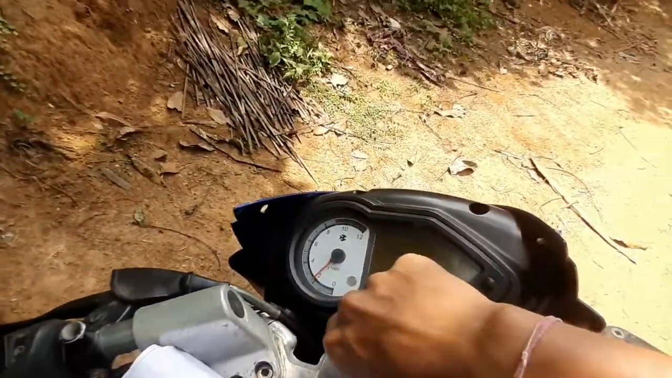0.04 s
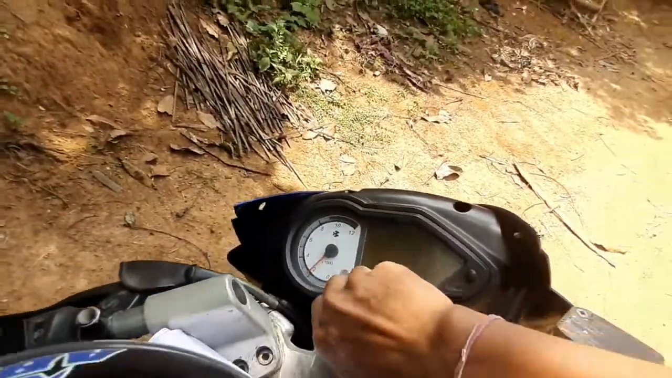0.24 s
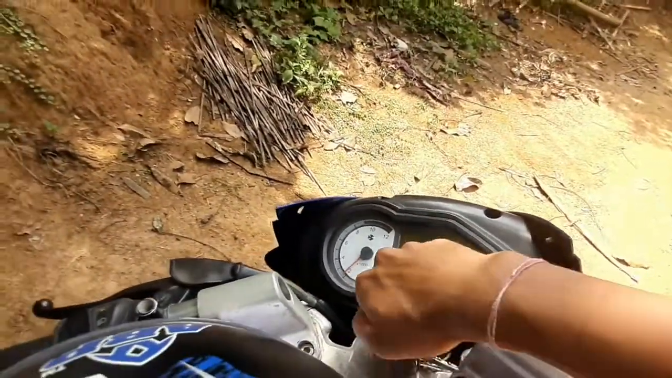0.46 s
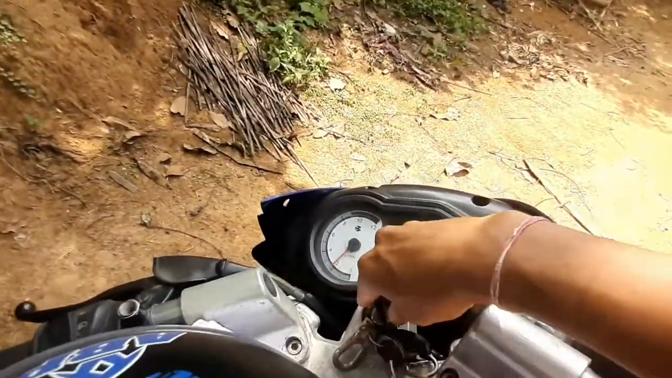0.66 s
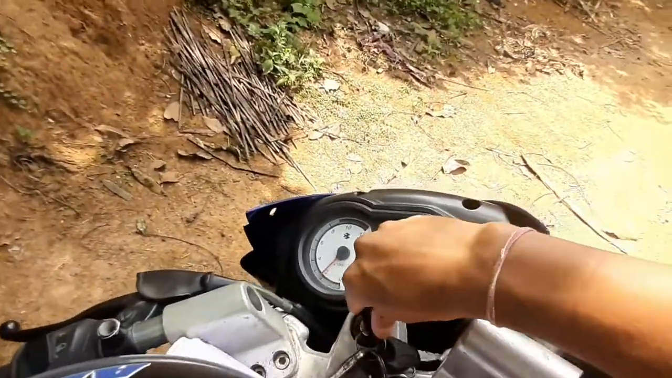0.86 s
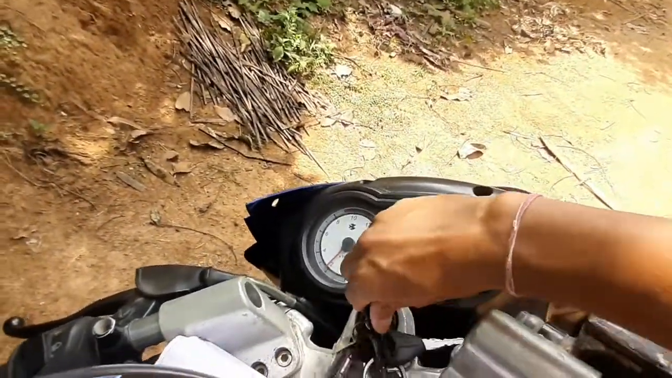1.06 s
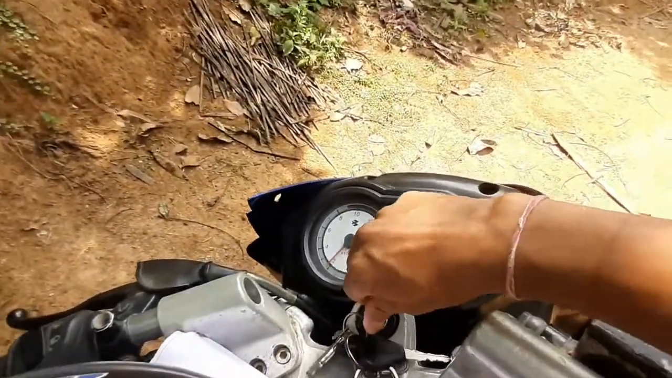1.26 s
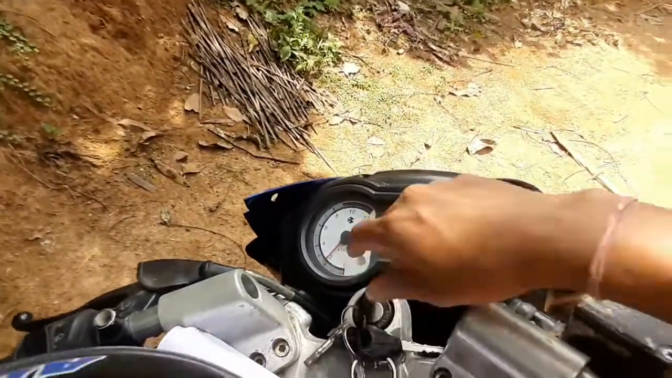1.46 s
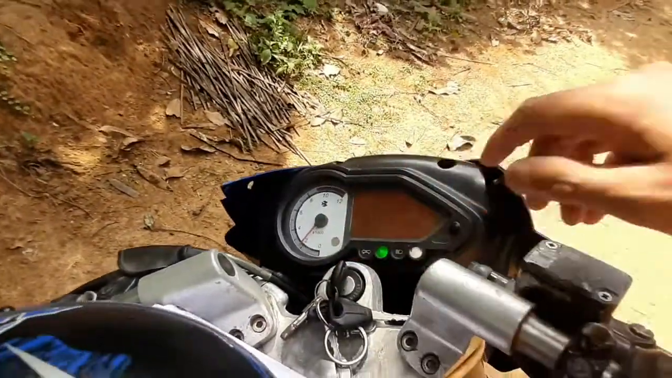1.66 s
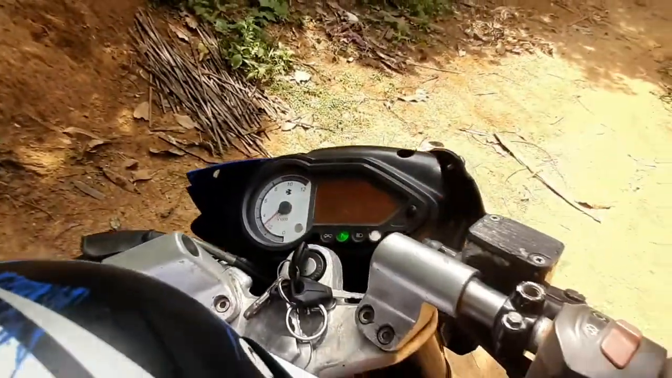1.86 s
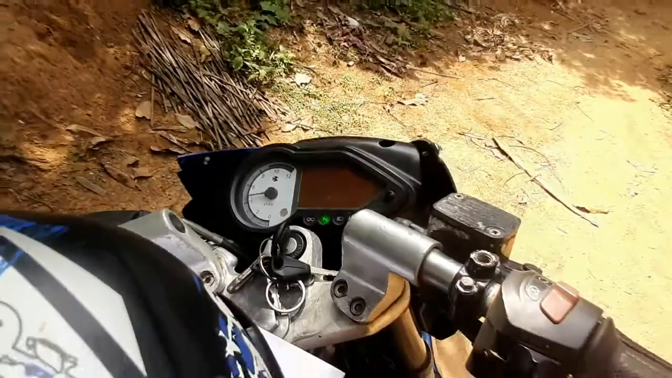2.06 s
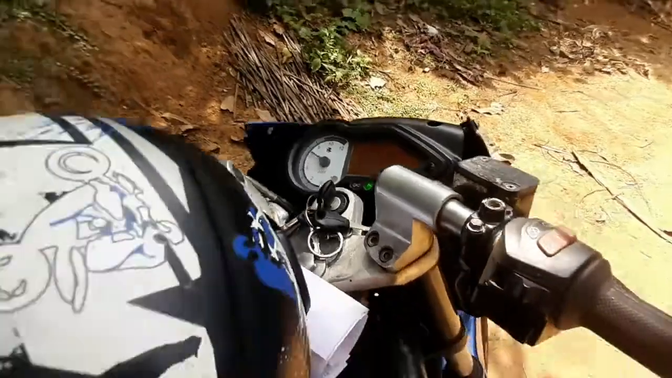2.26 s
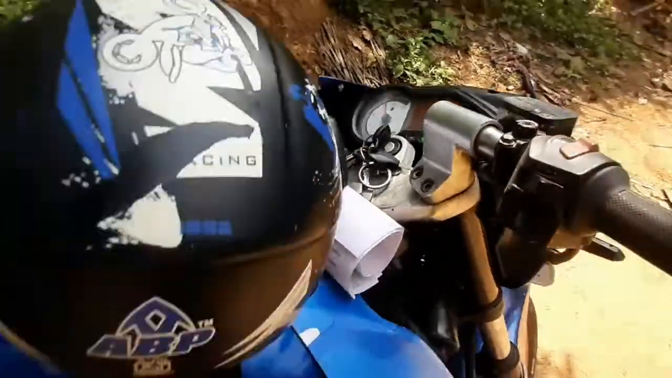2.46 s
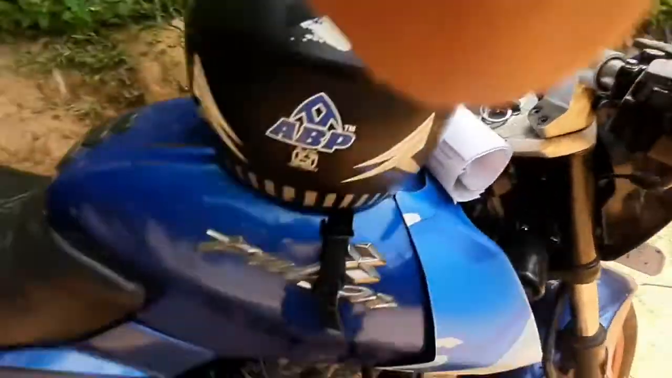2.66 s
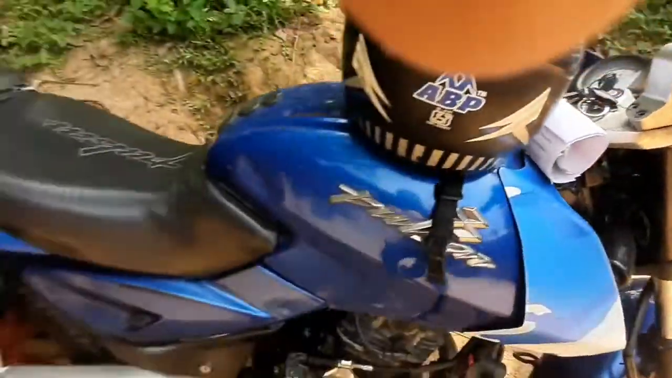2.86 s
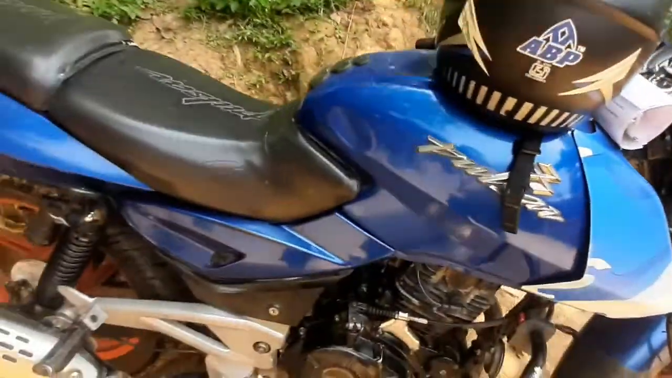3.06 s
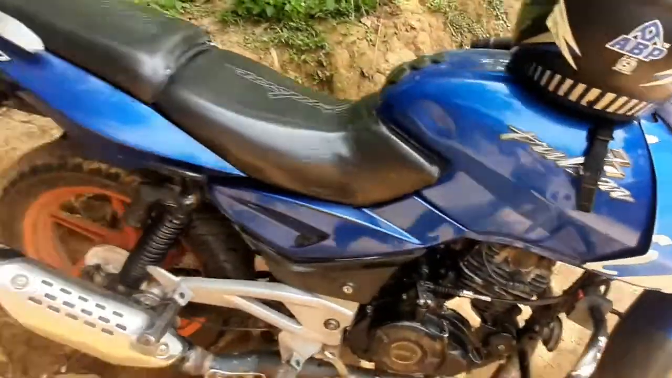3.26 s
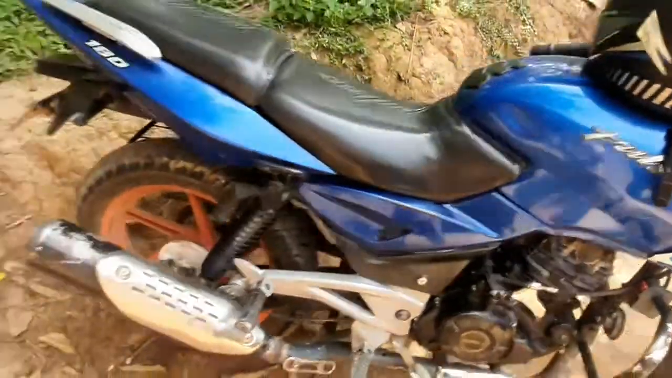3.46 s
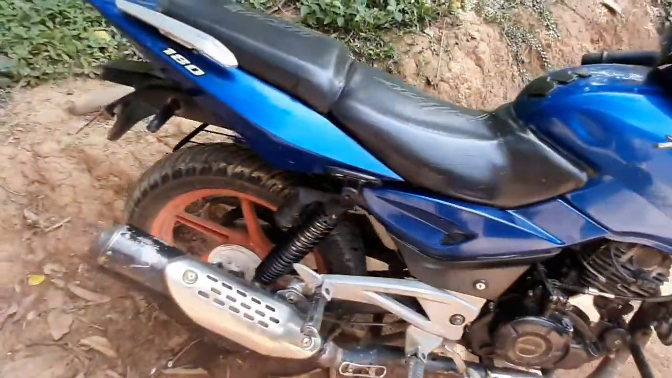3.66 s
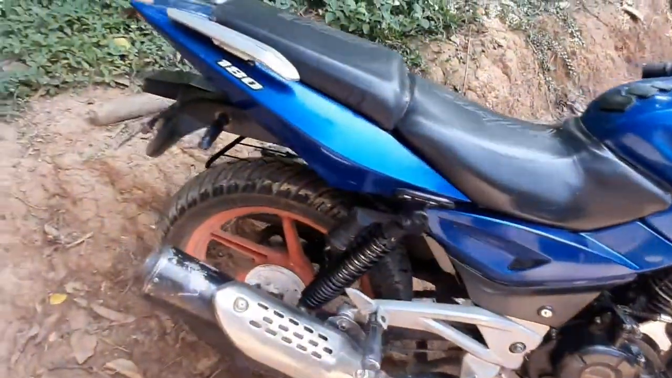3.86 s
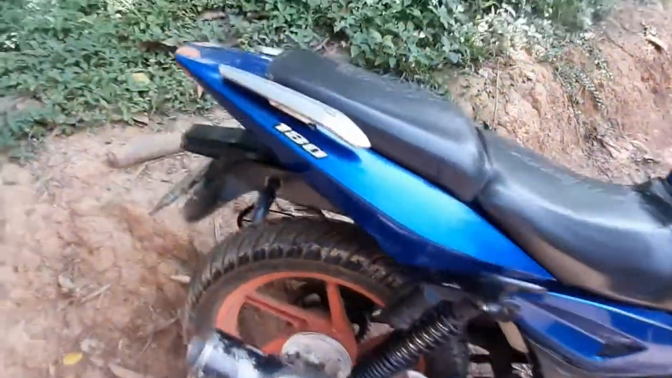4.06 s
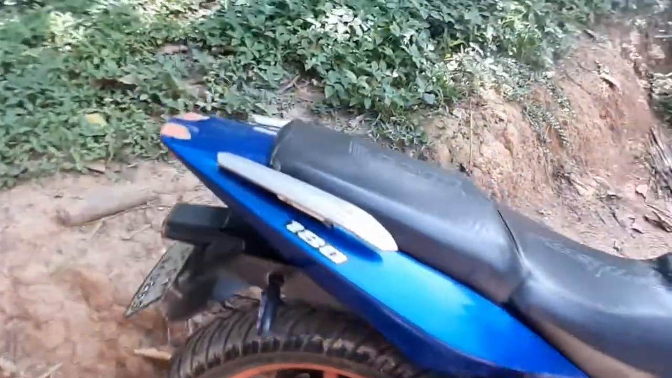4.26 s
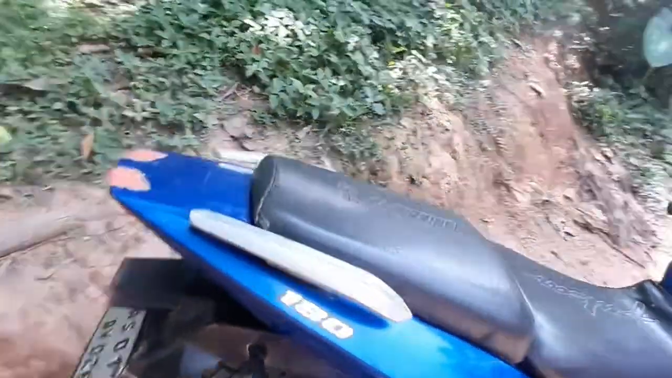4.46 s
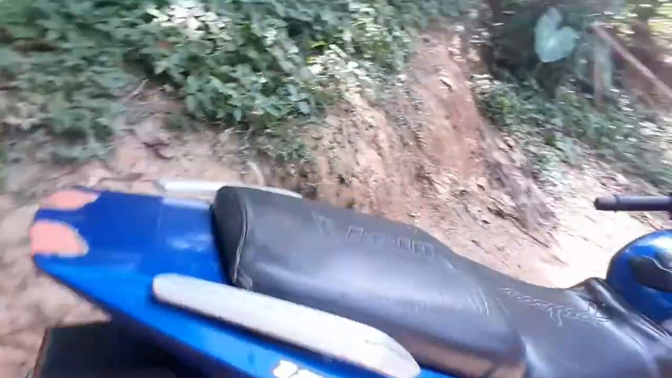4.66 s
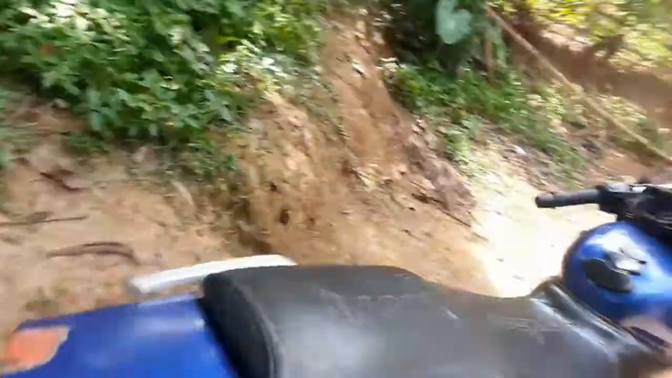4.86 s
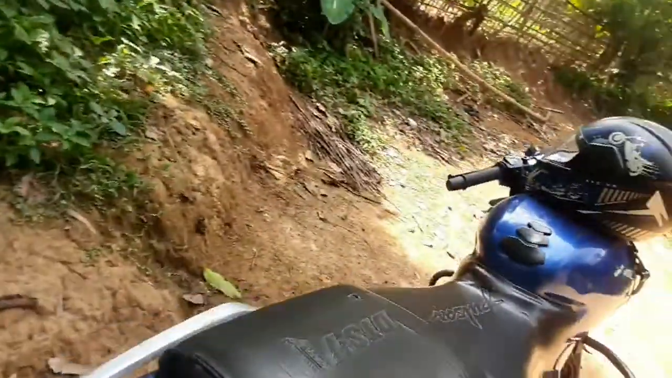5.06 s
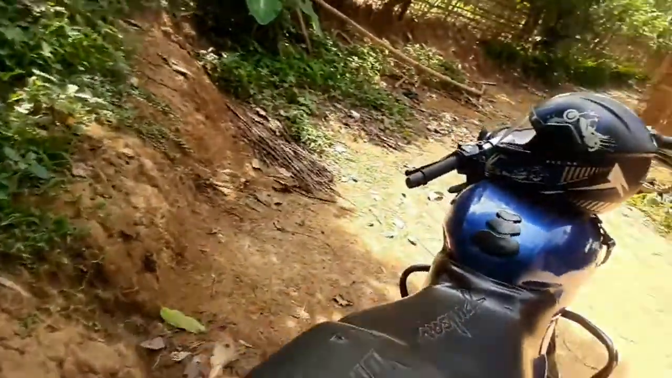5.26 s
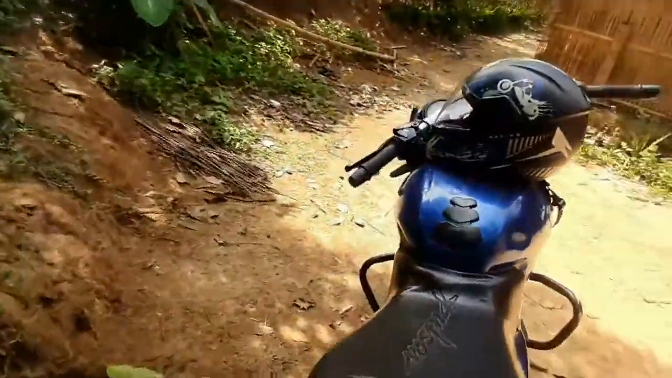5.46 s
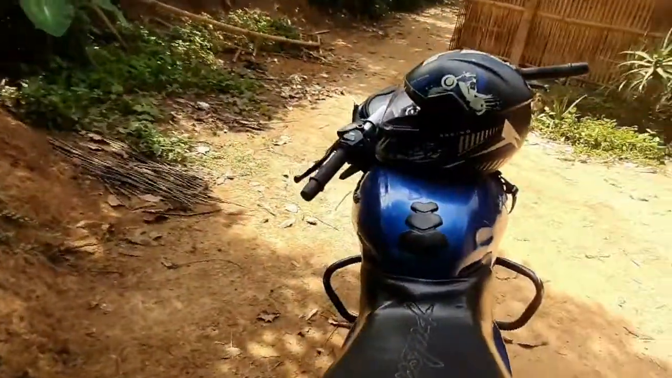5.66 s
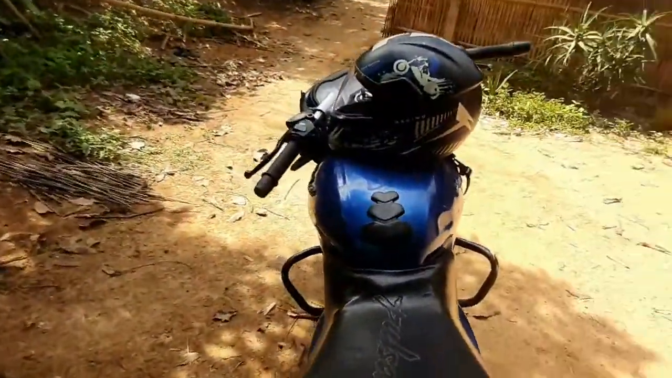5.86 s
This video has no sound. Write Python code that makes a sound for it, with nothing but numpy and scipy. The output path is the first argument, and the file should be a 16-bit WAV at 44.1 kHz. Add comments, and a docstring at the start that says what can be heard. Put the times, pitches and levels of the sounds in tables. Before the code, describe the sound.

Keys jingle and click sharply as one is fitted into a motorcycle's ignition lock, right by the microphone. Much quieter footsteps follow, sandals crunching on grit and ticking pebbles, with swishing clothes and a few low handling thuds on the phone. The place is outdoors and calm, with softly hissing air, faint insects and a distant bird whistling upward early on.

```python
"""A bunch of keys rattles and clicks into a motorcycle ignition lock, close to a phone held outdoors.
Each hit makes the steel clink and the bike's cover knock, and the hanging keys ring on.
Then sandals scuff dry earth, cloth swishes with each stride and the hand bumps the phone.
Behind it all, a bird whistles upward in the trees, insects drone and the air hisses softly."""
import sys
import numpy as np
from scipy import signal
from scipy.fft import rfft, irfft, next_fast_len
from scipy.io import wavfile
from scipy.ndimage import uniform_filter1d, map_coordinates

SR = 44100
rng = np.random.default_rng(int(sys.argv[2]) if len(sys.argv) > 2 else 0)


def store_pcm(level_fs):
    """Save levels as 16-bit WAV."""
    pcm = np.round(np.clip(level_fs, -1, 1) * 32767).astype(np.int16)
    wavfile.write(sys.argv[1], SR, np.atleast_2d(pcm).T)


N = 260498

# Keys hitting the lock: start_s, level_db, clink_hz, cover_knock_db
KEY_HITS = [(0.0196, -49, 3350, 3), (0.126, -52, 6360, 3.5), (0.2313, -38.5, 5350, -18),
            (0.264, -38, 5440, -13.5), (0.2856, -43, 5670, 2.5), (0.3214, -38.5, 5160, -9.5),
            (0.3644, -41.5, 3680, -6), (0.3769, -25.5, 3780, -19), (0.414, -38.5, 3440, -17.5),
            (0.4772, -13.5, 6180, -26.5), (0.504, -28.5, 5760, -14.5), (0.647, -30, 5480, -21.5),
            (0.7064, -24.5, 6100, -35), (.7146, -29, 4500, -35), (0.719, -23.5, 6100, -45),
            (0.7497, -32, 6260, -28.5), (0.8069, -24.5, 4350, -19), (0.8134, -24, 4450, -13),
            (0.826, -35.5, 2200, -11), (0.8957, -45.5, 5730, -14), (1.0534, -32.5, 3460, -14),
            (1.1191, -25, 4650, -8), (1.1287, -7, 5670, -21), (1.172, -23.5, 6540, -28.5)]
# Tone of the steel, its bright edge and the hollow cover: pitch_hz, level_db
STEEL_TONE = [(1100, -36), (1800, -14.5), (2640, -9.5), (3250, -3.5), (5600, 0.5), (6450, 1.5), (7800, -5),
              (9000, -28)]
EDGE_TONE = [(8500, -21), (12300, 0), (14100, -0.5), (15700, -7), (16100, -36.5)]
COVER_TONE = [(250, -18), (700, -9.5), (1050, -5), (1750, -2.5), (2500, -12.5), (3900, -33.5)]

def key_clicks():
    """Each hit cracks, rings the key's blade and knocks the cover around the lock."""
    out = np.zeros((2, N))
    for s, db, clink_hz, cover_db in KEY_HITS:
        force = amp(min(0, .1 * (db + 3)))  # light touches mostly ring the blade
        edge_db = min(-4, -28 - cover_db)  # the hollower the knock, the duller
        crack = force * puff(STEEL_TONE, .011, -24, .05)
        crack += amp(edge_db) * puff(EDGE_TONE, .012, -20, .04)
        clink = .8 * puff(narrow(clink_hz), .02, -24, .06)
        knock = amp(cover_db + 8) * puff(COVER_TONE, .03, -11, .14, alike=.95)
        left, right = crack + clink + knock
        lag = rng.integers(9)  # samples of delay at the right microphone
        right = np.pad(right, (lag, 0))[:len(left)]
        add(out, s, amp(db) * np.array([left, right]))
    return out

# The notes each hanging key rings with: pitch_hz, level_db
KEY_NOTES = {"long": [(3450, -8), (8800, -17), (11513, 0)], "flat": [(6270, -15), (14692, 0)],
             "small": [(13840, 0)], "ring": [(15600, 0)]}
# Keys swinging together: start_s, key_name, touch_s, level_db
KEY_SWINGS = [(0.025, "long", 0.043, -67), (.395, "small", .03, -61), (.735, "small", .04, -53),
              (.866, "long", .03, -60), (.72, "ring", 0.096, -45), (.75, "flat", .05, -47.5),
              (1.024, "long", 0.028, -45), (1.145, "small", 0.025, -47), (1.187, "flat", 0.018, -47),
              (1.228, "long", 0.02, -55)]

def key_chimes():
    """Hanging keys touch and ring with their own notes."""
    out = np.zeros((2, N))
    for s, key, touch_s, db in KEY_SWINGS:
        add(out, s, amp(db) * ring(KEY_NOTES[key], touch_s, fade_s=.038))
    return out

# Shakes of the bunch: peak_s, hold_s, level_db, rise_db_per_s
KEY_SHAKES = [(0.429, 0.082, -50, 226), (0.668, 0.032, -61.5, 701.5), (0.721, 0.11, -52, 260),
              (0.872, .03, -70, 2000), (1.056, 0.01, -50.5, 412), (1.142, .005, -38.5, 1294),
              (1.192, 0.008, -55, 399)]

def key_rattle():
    """Loose keys slide over each other in many tiny hits that clink and ping."""
    hits = grainy(per_s=450, spread_db=2.5, life_s=.0012, smooth=.8) * pair(.2)
    clatter = coloured(hits, STEEL_TONE) + amp(-5.5) * coloured(hits, COVER_TONE)
    clatter += amp(-1) * coloured(hits, EDGE_TONE)
    clinks_hz = [hz for _, _, hz, _ in KEY_HITS[::3]]
    pings_hz = [hz for key in KEY_NOTES.values() for hz, _ in key if hz > 10000]
    clatter += amp(-3) * resonant(hits, clinks_hz, width_hz=60)
    clatter += amp(-8) * resonant(hits, pings_hz, width_hz=60)
    return clatter * sum(swell(*shake, fall_db_per_s=347.5) for shake in KEY_SHAKES)

# Which side the keys are louder on: pitch_hz, left_over_right_db
KEY_SIDES = [(2500, -1), (5500, 2.5), (9000, -1.5)]

def keys():
    """The whole bunch; such small parts give off almost no bass."""
    bunch = key_clicks() + key_chimes() + key_rattle()
    return filtered(bunch, lambda hz: panned(along(KEY_SIDES, hz)) * hz ** 2 / (hz ** 2 + 400 ** 2))

# Soles dragging over earth: peak_s, hold_s, level_db
SOLE_DRAGS = [(2.058, 0.13, -61), (2.371, 0.26, -61), (2.66, 0.014, -53), (3.446, 0.016, -56),
              (3.564, 0.032, -44), (3.815, 0.072, -42.5), (3.993, 0.018, -45), (4.675, 0.041, -57),
              (5.27, 0.027, -51.5), (5.334, 0.091, -59), (5.451, 0.073, -57.5)]
# Tone of the grit: pitch_hz, level_db
GRIT_TONE = [(400, -11), (929, -5.5), (2190, 2.5), (5180, 4.5), (7410, -3), (8530, -17.5), (15200, -4.5),
             (15900, -46)]

def scuffs():
    """Grit crunches under a sole, then trickles on, weaker and slower."""
    crunch = grainy(per_s=420, spread_db=1, life_s=.0014, smooth=2.7) * pair(.097)
    drag = sum(np.maximum(swell(s, hold_s, db, 618, 475), swell(s, hold_s, db - 7.5, 618, 135))
               for s, hold_s, db in SOLE_DRAGS)
    return drag * amp(1.42 * wobble(30)) * coloured(crunch, GRIT_TONE)

# Soles landing: start_s, level_db, pitch_hz
SOLE_SLAPS = [(2.062, -48.5, 1560), (2.085, -46.5, 3840), (3.326, -45, 1520), (3.549, -35.5, 1520),
              (3.81, -35, 1793), (3.997, -43.5, 1470), (5.455, -49, 2010)]
# Pebbles and twigs: start_s, level_db
PEBBLE_TICKS = [(2.1156, -39.5), (2.4347, -37), (2.4415, -39.5), (2.4523, -37.5), (2.6668, -46),
                (3.1897, -40.5), (3.359, -39.5), (3.3678, -27), (3.4245, -40.5), (3.4451, -41),
                (4.9383, -44.5)]
# Tone of a pebble: pitch_hz, level_db
PEBBLE_TONE = [(400, -14), (2100, 3), (6000, -2), (8500, -27), (12000, -22.5)]

def steps():
    """Soles land with a hollow knock; pebbles and twigs tick."""
    out = np.zeros((2, N))
    for s, db, hz in SOLE_SLAPS:
        add(out, s, amp(db) * puff(narrow(hz), .09, -30, .1))
    for s, db in PEBBLE_TICKS:
        add(out, s, amp(db) * puff(PEBBLE_TONE, .006, -12, .04))
    return out

# Strides: start_s, length_s, level_db
STRIDES = [(2.965, 0.51, -59.5), (3.67, 0.49, -61.5), (4.252, 0.38, -60.5), (4.79, 0.31, -61),
           (5.301, 0.34, -63)]
# Tone of the cloth: pitch_hz, level_db
CLOTH_TONE = [(2500, -13.5), (4200, 1), (5800, 0), (7200, -10.5), (8500, -21.5), (13200, -7), (13700, -7),
              (14300, -12.5)]

def cloth():
    """Cloth swishes unevenly with each stride."""
    level = sum(amp(db) * swell(s + .027, length_s - .04, 0, 310, 210) for s, length_s, db in STRIDES)
    return level * amp(1.7 * wobble(12)) * coloured(pair(.06), CLOTH_TONE)

# A slipping sole: time_s, pitch_hz, level_db
SOLE_SLIP = [(5.352, 345, -56), (5.39, 352, -56), (5.42, 385, -68)]

def sole_squeak():
    """Rubber slips hundreds of times a second, making one squeak."""
    slip_hz, db = curves(SOLE_SLIP)
    phase = 2 * np.pi * np.cumsum(slip_hz * (1 + .04 * wobble(200))) / SR
    squeak = np.sin(phase) + np.sin(2 * phase - 1) + np.sin(3 * phase + 1) + .3 * np.sin(4 * phase)
    return during(SOLE_SLIP, .015) * amp(db + 3 * wobble(500)) * unit(squeak)

# The hand on the phone: peak_s, hold_s, level_db, left_over_right_db, lowest_hz
HAND_BUMPS = [(2.416, 0.016, -41.5, -27, 88.5), (3.114, 0.014, -60.5, -7, 40), (3.32, 0.025, -55, 23, 40),
              (3.389, 0.032, -46.5, 28.5, 40), (3.47, 0.058, -57.5, 22, 40),
              (3.525, 0.0049, -42, 26.5, 40.2), (5.453, .06, -45, -3, 232)]
# Tone of a bump: pitch_hz, level_db
THUD_TONE = [(45, -2), (70, 8.5), (110, -2.5), (198, -10), (384, -32), (650, -82)]

def hand_bumps():
    """Fingers shifting on the case make low thuds, different at each microphone."""
    thud = coloured(pair(0), THUD_TONE)
    thud /= np.sqrt(np.abs(uniform_filter1d(thud ** 2, size=2000)) + .15)  # evens out the loudness
    out = np.zeros((2, N))
    for s, hold_s, db, side_db, lowest_hz in HAND_BUMPS:
        bump = filtered(thud, lambda hz: hz ** 4 / (hz ** 4 + lowest_hz ** 4))
        out += panned([side_db]) * swell(s, hold_s, db, 812, 424) * bump
    fingertip_tap = puff([(100, 9), (500, -.5), (1200, -35)], .025, -12, .13)
    add(out, 2.452, amp(-33) * fingertip_tap)
    return out

# Rising whistles: start_s, top_hz, relative_db
WHISTLES = [(.935, 5700, -71), (1.325, 5750, -75), (1.515, 5750, -74), (1.745, 4700, -79),
            (1.94, 4700, -81)]

def bird():
    """Rising whistles and one later peep, smeared by echoes from the trees."""
    song = sum(tone([(s, 3650, db - 6), (s + .045, 4450, db + 3), (s + .09, top_hz, db - 2)], 3.5, .018)
               for s, top_hz, db in WHISTLES)
    out = amp(-15) * song + amp(4) * tree_echoes(song, fade_s=.7)
    peep = tone([(4.1, 4250, -71), (4.15, 4250, -71)], 3.5, .02)
    return out + tree_echoes(peep, fade_s=.2)

def tree_echoes(sound, fade_s):
    """Leaves and banks scatter sound back, differently to each side."""
    t = np.arange(SR // 2) / SR
    tail = rng.standard_normal((2, len(t))) * amp(-60 * t / fade_s)
    return signal.fftconvolve(sound[None], tail / np.linalg.norm(tail[0]), axes=1)[:, :N]

# Two far calls: time_s, pitch_hz, relative_db
SOFT_COO = [(3.25, 322, -87), (3.97, 345, -81), (4.3, 325, -92)]
SHORT_SQUEAL = [(5.645, 1076, -77), (5.685, 940, -79), (5.695, 1080, -86)]

def far_calls():
    """A soft coo and, later, a short squeal."""
    return tone(SOFT_COO, waver_db=2.5) + tone(SHORT_SQUEAL, waver_db=2)

# Notes of a far piece of metal: pitch_hz
METAL_NOTES = [1060, 1470, 2160, 2900]

def far_clank():
    """Metal rings once, its higher notes a little weaker."""
    out = np.zeros((2, N))
    notes = [(hz, -hz / 1200) for hz in METAL_NOTES]
    add(out, 5.55, amp(-74) * ring(notes, touch_s=.1, fade_s=.15))
    return out

# Insect drones: pitch_hz, width_hz, list of (time_s, level_db)
DRONES = [(1615, 215, [(1.4, -81.5), (1.6, -73.5), (3.2, -71), (4.9, -131)]), (2057, 70, [(1.3, -79.5),
          (4.9, -79.5)]), (6090, 870, [(0, -62), (.25, -63.5), (.9, -67.5)])]

def insects():
    """Each drone is a narrow band of fluttering noise."""
    out = np.zeros((2, N))
    for pitch_hz, width_hz, levels in DRONES:
        drone = filtered(pair(.046), lambda hz: np.exp(-((hz - pitch_hz) / width_hz) ** 2))
        out += during(levels, .7) * amp(curves(levels)[0] + 1.4 * wobble(36)) * unit(drone)
    return out

# Tone of the open air: pitch_hz, level_db
AIR_TONE = [(18, -44.5), (30, -7), (157, -2.5), (937, -18), (1720, -19), (2900, -22), (3900, -7),
            (5600, -8), (6400, -14.5), (7500, -13), (8300, -40), (12000, -17), (16000, -19.5)]
# Its loudness: time_s, hiss_db, rumble_db
AIR_LEVELS = [(0, -65.5, -76.5), (2.0, -68.5, -80), (3.4, -66, -78), (5.9, -65, -76)]
# How alike left and right are: pitch_hz, likeness (0 to 1)
AIR_LIKENESS = [(240, 0.73), (950, 0.12), (3800, 0.0054)]

def air():
    """Patchy outdoor hiss over a low rumble."""
    def shape(hz):
        turn = np.arccos(along(AIR_LIKENESS, hz)) / 2
        return amp(along(AIR_TONE, hz)) * [np.cos(turn), np.sin(turn)]
    middle, side = filtered(rng.standard_normal((2, N)), shape)
    noise = np.array([middle + side, middle - side])
    low = filtered(noise, lambda hz: 1 / (1 + (hz / 450) ** 4))
    hiss_db, rumble_db = curves(AIR_LEVELS)
    hiss = amp(hiss_db + .4 * wobble(20)) * unit(noise - low)
    return hiss + amp(rumble_db + .74 * wobble(1.5)) * unit(low)

def puff(spectrum, fade_s, tail_db, tail_s, alike=.62):
    """A crack of noise with peak 1; it drops 60 dB in fade_s, its weaker tail in tail_s."""
    t = np.arange(SR // 8) / SR
    a, b = rng.standard_normal((2, len(t)))
    noise = coloured(np.array([a, alike * a + np.sqrt(1 - alike ** 2) * b]), spectrum)
    fade = amp(-60 * t / fade_s) + amp(tail_db - 60 * t / tail_s)
    burst = noise * fade * (1 - np.exp(-t / .0004))
    return burst / np.abs(burst).max()

def ring(notes, touch_s, fade_s):
    """Metal rings unevenly while touched, then drops 60 dB in fade_s."""
    t = np.arange(SR // 4) / SR
    level = (1 - np.exp(-t / .0035)) * amp(-60 * np.maximum(t - touch_s, 0) / fade_s)
    return sum(level * amp(db + 5.5 * wobble(90)[:len(t)])
               * np.sin(2 * np.pi * hz * t + rng.normal(0, .77, (2, 1))) for hz, db in notes)

def tone(rows, waver_db, rough=.025):
    """A wavering note along (time_s, pitch_hz, relative_db) rows, raised by 11 dB."""
    hz, db = curves(rows)
    level = during(rows) * amp(db + 11 + waver_db * wobble(25.04))
    return level * np.sin(2 * np.pi * np.cumsum(hz * (1 + rough * wobble(150))) / SR)

def grainy(per_s, spread_db, life_s, smooth):
    """The loudness of many tiny fading hits, on top of a smooth part."""
    hits = (rng.random(N) < per_s / SR) * amp(spread_db * rng.exponential(size=N))
    grains = signal.lfilter([1], [1, -np.exp(-1 / (life_s * SR))], hits)
    return unit(unit(grains) + smooth)

def swell(peak_s, hold_s, db, rise_db_per_s, fall_db_per_s):
    """Loudness that builds up, holds, then dies away."""
    t = np.arange(N) / SR - peak_s
    return amp(db + rise_db_per_s * np.minimum(t, 0) - fall_db_per_s * np.maximum(t - hold_s, 0))

def resonant(x, notes_hz, width_hz):
    """Makes x ring briefly at each note."""
    return unit(filtered(x, lambda hz: sum(
        1j * hz * width_hz / (note ** 2 - hz ** 2 + 1j * hz * width_hz) for note in notes_hz)))

def narrow(hz):
    """The tone of one short ring."""
    return [(hz / 1.2, -30), (hz, 0), (hz * 1.2, -30)]

def pair(alike):
    """Left and right white noise, from unrelated (0) to the same (1)."""
    turn = np.arccos(alike) / 2
    a, b = rng.standard_normal((2, N))
    return np.array([np.cos(turn) * a + np.sin(turn) * b, np.cos(turn) * a - np.sin(turn) * b])

def wobble(per_s):
    """A smooth curve through per_s random points a second."""
    points = rng.standard_normal(int(N * per_s / SR) + 4)
    return map_coordinates(points, [np.arange(N) * per_s / SR])

def filtered(x, gain_at):
    """Turns each frequency of x up or down by gain_at(hz)."""
    size = next_fast_len(x.shape[-1] + 4096)
    return irfft(rfft(x, size) * gain_at(np.fft.rfftfreq(size, 1 / SR)), size)[..., :x.shape[-1]]

def coloured(x, spectrum):
    """Gives x the tone of a (pitch_hz, level_db) table, at average power 1."""
    return unit(filtered(x, lambda hz: amp(along(spectrum, hz))))

def along(points, hz):
    """Reads between (pitch_hz, value) points on a musical scale."""
    pitches, values = np.transpose(points)
    return np.interp(np.log(hz + 1), np.log(pitches + 1), values)

def curves(rows):
    """One value per sample for each column after the time."""
    times, *columns = np.transpose(rows)
    return [np.interp(np.arange(N) / SR, times, column) for column in columns]

def during(rows, fade_s=.02):
    """1 from a table's first time to its last, fading to 0 outside."""
    t = np.arange(N) / SR
    return np.clip(np.minimum(t - rows[0][0], rows[-1][0] - t) / fade_s + 1, 0, 1)

def panned(side_db):
    """Left and right gains, the left louder by side_db."""
    return amp([np.multiply(side_db, .5), np.multiply(side_db, -.5)])

def add(out, start_s, sound):
    """Mixes a short stereo sound in."""
    k = round(start_s * SR)
    out[:, k:k + sound.shape[1]] += sound[:, :N - k]

def amp(db):
    """Decibels to gain."""
    return 10 ** (np.asarray(db, float) / 20)

def unit(x):
    """Scales x to average power 1."""
    return x / np.sqrt(np.mean(x ** 2) + 1e-20)

def scene():
    """All the sounds at the phone's two microphones."""
    near = keys() + scuffs() + steps() + cloth() + sole_squeak() + hand_bumps()
    return near + bird() + far_calls() + far_clank() + insects() + air()

def record(dry):
    """The phone keeps nothing above 16100 Hz."""
    return filtered(dry, lambda hz: hz < 16100)

dry = scene()
out = record(dry)
store_pcm(out)
```